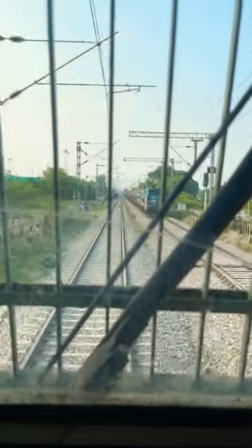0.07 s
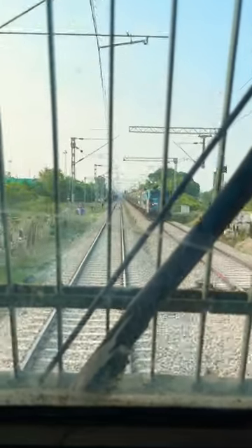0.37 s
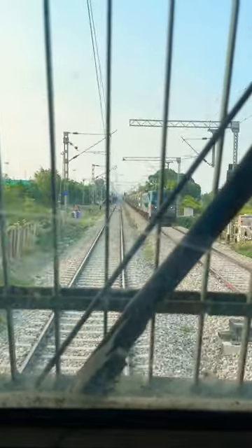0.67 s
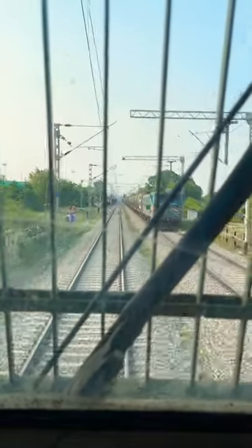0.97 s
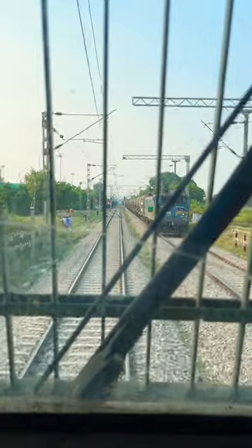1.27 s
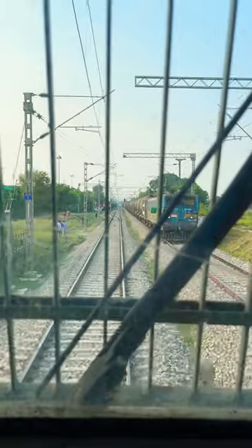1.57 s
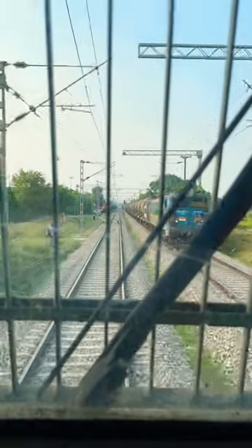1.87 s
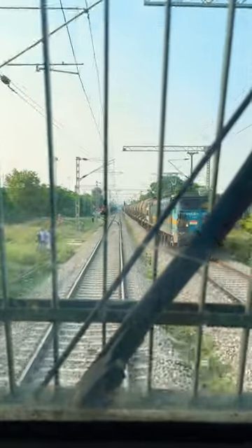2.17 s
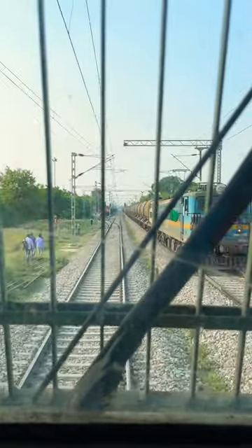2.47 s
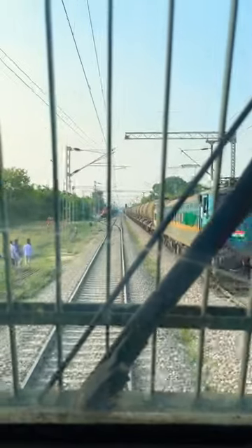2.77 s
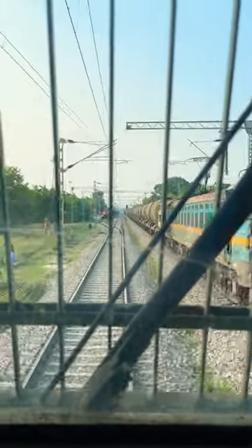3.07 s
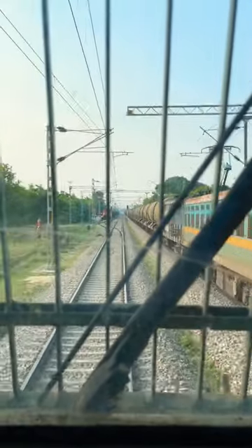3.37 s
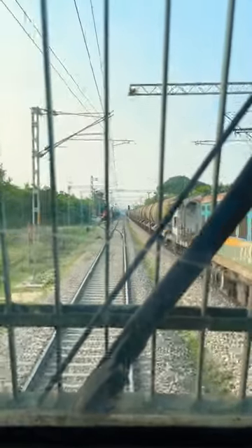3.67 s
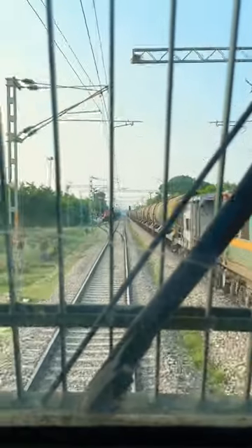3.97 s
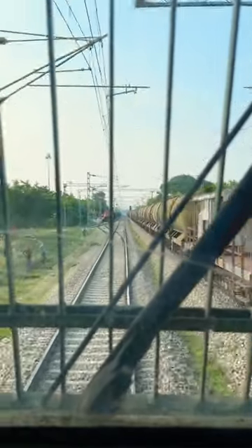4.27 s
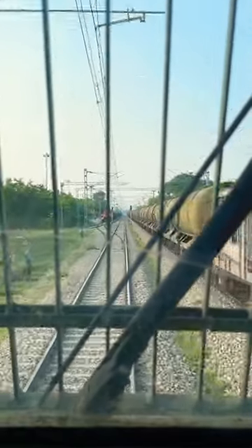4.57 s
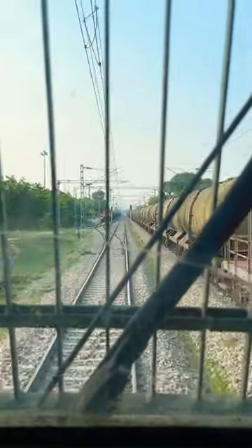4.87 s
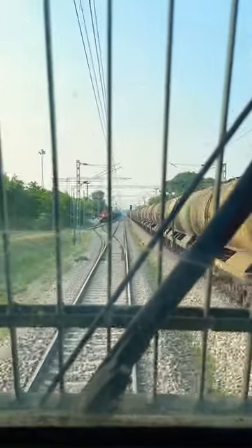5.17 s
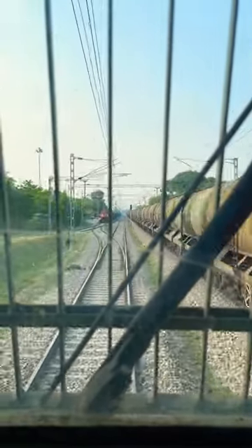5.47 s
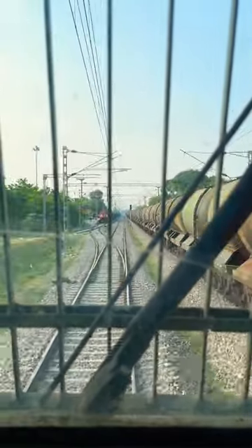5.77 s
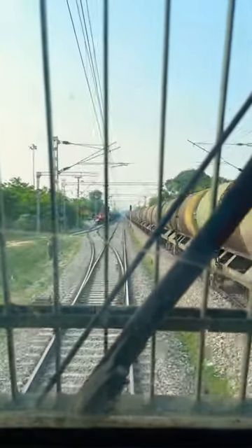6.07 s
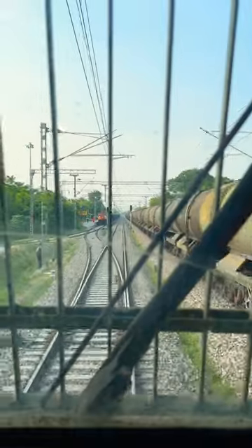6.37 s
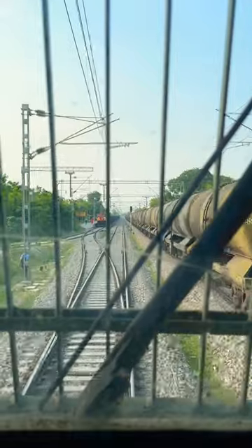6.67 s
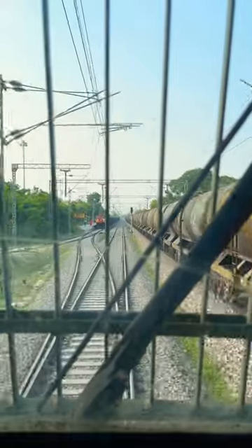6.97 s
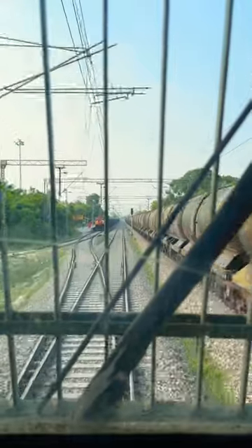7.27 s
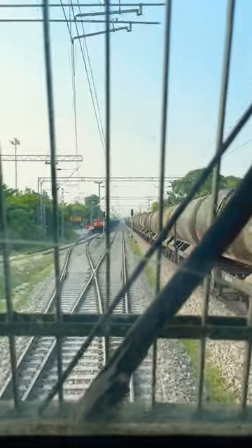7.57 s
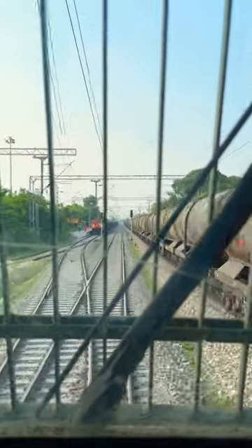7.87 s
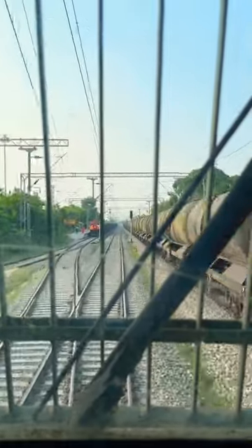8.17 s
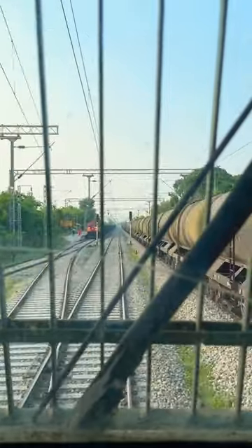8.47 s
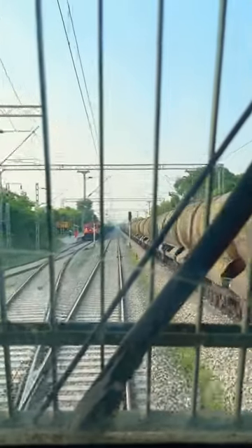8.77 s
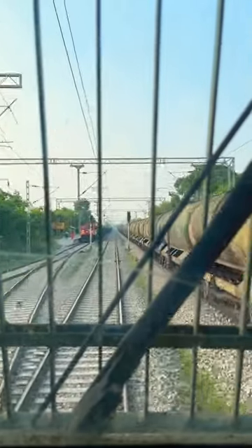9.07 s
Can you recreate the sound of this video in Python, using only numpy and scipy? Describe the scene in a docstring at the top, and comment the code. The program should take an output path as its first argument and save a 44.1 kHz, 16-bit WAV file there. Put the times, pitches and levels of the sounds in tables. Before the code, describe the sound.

An air horn sounds one brassy note from the start, heard inside the cab of a moving electric locomotive; it weakens, dulls and cuts off at about 0.8 seconds. A deep rumble from the track and floor runs throughout, growing steadily louder. Wheels thump over joints around 1.3 to 1.6 seconds, and again near 3, 4 and 6 seconds. Loose metal fittings tick three times around 2.5 seconds, among light knocks and soft, high swishes. From about 4 seconds a passing freight train adds a rolling roar with scattered clatter and dull clacks, while a wavering gear whine becomes stronger. The cab panels boom around 5.7 and 6.3 seconds. A valve vents compressed air in two short, bright hisses at about 7.8 and 8.5 seconds. The heaviest wheel thumps and panel booms come near 8.8 and 9.3 seconds, with the rumble still going.

```python
"""An air horn blares and cuts off, heard inside the cab of a moving electric locomotive.
Rough track shakes the floor and panels, wheels thump over joints, and the traction gears whine.
A freight train of tank wagons passes on the next line, adding its roar and throwing back the whine.
Loose fittings tick in the cab, and near the end a valve vents compressed air twice."""
import sys
import numpy as np
from scipy import signal
from scipy.fft import rfft, irfft, next_fast_len
from scipy.io import wavfile
from scipy.ndimage import uniform_filter1d, map_coordinates

SR = 44100
rng = np.random.default_rng(int(sys.argv[2]) if len(sys.argv) > 2 else 0)


def wrap_up_sound(samples):
    """Save the sound to the file named by the first command line argument, as 16-bit audio."""
    columns = np.atleast_2d(samples).T
    # keep every value between -1 and 1, then stretch to whole-number steps
    tamed = np.clip(columns, -1, 1)
    steps = np.round(tamed * 32767).astype(np.int16)
    wavfile.write(sys.argv[1], SR, steps)


N = 411453

# The horn's timbre. Each row: harmonic number, relative level in dB.
HORN_HARMONICS = [(1, 0), (2, -34), (3, -23), (4, -14), (5, -27), (6, -15.5), (7, -16), (8, -38), (9, -9),
                  (10, -22), (11, -26.5), (12, -28.5), (13, -29), (14, -32.5), (15, -31.5), (16, -33.5),
                  (17, -29.5), (18, -32), (19, -45), (20, -29), (21, -29), (22, -42), (23, -27), (24, -31),
                  (25, -28), (26, -47)]
# The blare sinks as the valve eases. Each row: time in seconds, relative level in dB.
BLARE_FADE = [(0, -34), (0.44, -32), (0.53, -36.5), (0.6, -38.5), (0.68, -39.5), (0.75, -43), (0.85, -45)]
# A hollow note stirred by the air stream. Each row: pitch in Hz, half-width in Hz, relative level in dB.
HORN_HOLLOW = [(698, 2.7, 2.5), (646, 14, -8), (652, 19, -11)]
# Air rushing through the horn. Each row: frequency in Hz, relative level in dB.
HORN_RUSH = [(700, -8), (1300, 9), (1550, 0.5), (2800, 4.5), (3600, -3), (5000, -5.5), (6000, 0),
             (8000, -2.5), (9500, -3.5), (11200, -13), (16000, 3.5)]

def horn():
    """An air horn with a weak, higher partner; as the pressure falls it rises, dips, dulls and stops."""
    bend_s, dull_s, shut_s = .55, .6, .776
    pitch_hz = 320.7 + 21 * since(bend_s)
    phase = phase_of(pitch_hz * (1 + .0011 * wobble(39.2))) + .016 * wobble(260)
    brass = overtones(phase, HORN_HARMONICS[1:10], flicker_db=.8, smear=.014, dull_db=27 * since(dull_s))
    buzz = overtones(phase, HORN_HARMONICS[10:], flicker_db=3.2, smear=.08, dull_db=0)
    partner_phase = phase_of(351.5 * (1 + .003 * wobble(45)))
    partner = unit(sum(amp(1.9 * wobble(19)) * np.sin(k * partner_phase + rng.uniform(0, 2 * np.pi))
                       for k, _ in HORN_HARMONICS[1:]))
    blare_db = curve(BLARE_FADE)
    easing_db = blare_db - np.mean([db for _, db in BLARE_FADE])
    fundamental = amp(-22.4 - 7.5 * bump(.497, width_s=.068) + .9 * wobble(30)) * np.sin(phase)
    hollow = amp(-42 + .39 * easing_db) * ringing(HORN_HOLLOW, steady=.4)
    blare = amp(blare_db - 3.5 - 14 * bump(.567, width_s=.02)) * brass  # breaks for an instant
    rasp = amp(-4.5 - 55 * since(dull_s)) * buzz + amp(-3.5) * partner + amp(2.5) * noise(HORN_RUSH)
    rasp *= amp(-46 + .49 * easing_db)
    blast = amp(-170 * since(shut_s)) * (fundamental + hollow + blare + rasp)
    return blast + amp(-18) * cab_echo(blast, t60=1.0)

def overtones(phase, harmonics, flicker_db, smear, dull_db):
    """Rough horn harmonics: smear jitters the phase, and each step above the sixth loses dull_db."""
    total = np.zeros(N)
    for k, db in harmonics:
        gain = amp(db + flicker_db * wobble(44.7) - dull_db * max(k - 6, 0))
        total += gain * np.sin(k * (phase + smear * wobble(70.6)))
    return total / np.sqrt(sum(amp(db) ** 2 for _, db in harmonics) / 2)

# Roughness of the track under the cab. Each row: time in seconds, relative level in dB.
TRACK_ROUGHNESS = [(0, -40.5), (0.15, -34), (0.75, -32.5), (1.0, -33.5), (1.3, -30.5), (3.7, -28.5),
                   (4.9, -23), (5.4, -25.5), (7.15, -23), (7.55, -24.5), (8.0, -23), (8.3, -24),
                   (8.8, -20.5), (9.33, -20)]
# The floor's dark colour. Each row: frequency in Hz, relative level in dB.
FLOOR_COLOUR = [(35, -33), (55, -10.5), (66, -5), (105, -1.5), (128, -6), (148, -13), (220, -18),
                (350, -29.5), (1500, -81)]
# Resonances of the cab's air. Each row: pitch in Hz, half-width in Hz, relative level in dB.
CAB_MODES = [(81.5, 10.6, -2), (98, 6.1, -2), (113.1, 13.6, -2)]

def floor_rumble():
    """The track shakes the floor and the air in the cab."""
    shaking = noise(FLOOR_COLOUR) + amp(1.5) * ringing(CAB_MODES, steady=.79)
    return amp(curve(TRACK_ROUGHNESS) - .77) * unit(shaking * amp(.7 * wobble(21)))

# Wheels striking joints and points. Each row: start in seconds, relative level in dB.
JOINTS = [(1.248, -10.5), (1.381, -11.5), (1.648, -7), (3.132, -8.5), (3.999, -7), (4.249, -4.5),
          (5.816, -3.5), (8.654, -12), (8.766, 2), (9.242, 2.5), (9.286, 0.5)]

def joint_thumps():
    """Each joint kicks the body into a short, low boom at a slightly different pitch."""
    thumps, t = np.zeros(N + SR), np.arange(SR // 2) / SR
    for (s, db), hz in zip(JOINTS, 96 * (1 + rng.normal(0, .11, len(JOINTS)))):
        bounce = np.sin(2 * np.pi * hz * t) * (1 - np.exp(-t / .0029))
        thumps[round(s * SR):][:len(t)] += amp(db - 5.5 - 60 * t / .13) * bounce
    return thumps[:N]

# Swells of the swaying body. Each row: time in seconds, level in dB.
SWAY_LEVEL = [(0, -36), (0.75, -33.5), (2.4, -41.5), (2.8, -32.5), (4.6, -42.5), (5.9, -33), (6.8, -36),
              (8.75, -28), (9.33, -44.5)]
# Resonances of the suspension. Each row: pitch in Hz, half-width in Hz, relative level in dB.
SPRING_MODES = [(49.2, 1.8, 9), (29, 4, -21)]

def body_sway():
    """The body rides on its springs with a deep drone."""
    bass = noise([(18, -39), (27, 3.5), (55, 9), (75, -19), (200, -63)])
    return amp(curve(SWAY_LEVEL)) * unit(bass + amp(.5) * ringing(SPRING_MODES, steady=.46))

# The panels flex. Each row: start in seconds, level in dB.
PANEL_FLEXES = [(1.43, -43), (5.64, -24), (6.24, -23), (8.96, -22), (9.25, -20)]
# Resonances of the panels. Each row: pitch in Hz, half-width in Hz, relative level in dB.
PANEL_MODES = [(170.2, 5, 4), (191.6, 11.8, -0.5), (222, 4.6, -4.5), (260, 12, -9.5), (298.5, 6.8, -6),
               (318, 21.4, -12), (394.2, 10.4, -6)]

def panel_boom():
    """The cab's panels hum louder on rough track and boom when they flex."""
    shaking = amp(-38.5 + .83 * swing(TRACK_ROUGHNESS) + 2.1 * wobble(4.5))
    flexing = strikes(PANEL_FLEXES, attack=.088, t60=.98)
    return np.hypot(shaking, flexing) * ringing(PANEL_MODES, steady=.53)

# The gears' mesh note, then its octave. Each row: time in seconds, relative level in dB.
MESH_LEVEL = [(0, -47), (0.35, -42), (1.2, -47), (3.6, -47), (4.35, -38), (5.1, -39.5), (5.3, -42.5),
              (5.6, -39.5), (6.05, -41), (6.55, -36), (7.45, -39.5), (7.85, -34.5), (8.15, -39),
              (8.38, -33), (8.6, -36.5), (9.33, -35.5)]
OCTAVE_LEVEL = [(0, -46.5), (1.25, -53), (2.8, -49), (3.8, -53), (4.0, -45), (5.1, -42), (5.35, -50),
                (5.63, -43.5), (6.03, -45.5), (6.17, -36), (6.42, -45), (6.62, -40), (6.73, -45),
                (6.86, -38), (7.05, -40), (7.25, -36.5), (7.55, -41), (7.7, -35), (7.88, -44.5),
                (8.28, -34), (8.46, -40), (8.57, -35.5), (8.74, -42.5), (8.86, -34), (9.03, -40.5),
                (9.33, -38)]
# The fuzz around each note. Each row: pitch in Hz, half-width in Hz, relative level in dB.
MESH_FUZZ = [(544, 17, -6), (566, 8.8, 1.5), (541, 14, -4.5)]
OCTAVE_FUZZ = [(1078, 17, -2), (1048, 9, -7)]

def gear_whine():
    """Traction gears churn on a fuzzy note and sing its octave, louder as the wagons throw both back."""
    mesh_db = curve(MESH_LEVEL) - .2 + 1.6 * wobble(18)
    octave_db = curve(OCTAVE_LEVEL) - .6 + 1.9 * wobble(24)
    phase = phase_of(hz=1079 + 7 * wobble(35))
    mesh = unit(ringing(MESH_FUZZ, steady=.9) + amp(-4) * np.sqrt(2) * np.sin(phase / 2))
    octave = unit(ringing(OCTAVE_FUZZ, steady=.95) + amp(1.5) * np.sqrt(2) * np.sin(phase))
    return amp(mesh_db) * mesh + amp(octave_db) * octave

# The freight train's roar builds. Each row: time in seconds, relative level in dB.
FREIGHT_SWELL = [(1.0, -53), (2.53, -51), (3.95, -50.5), (4.19, -45.5), (4.4, -44.5), (4.95, -44.5),
                 (5.36, -47.5), (5.68, -45), (6.06, -47.5), (6.32, -45.5), (8.86, -41.5), (9.2, -41)]
# The midrange body of rolling wheels. Each row: frequency in Hz, relative level in dB.
ROLLING_COLOUR = [(100, -24), (250, -2.5), (330, 4.5), (425, -2), (480, 4), (620, 2), (720, 0), (810, -6.5),
                  (980, -5), (1150, -4), (1450, -26), (3000, -40), (8000, -86)]

def freight_roll():
    """The passing train walls in the track noise and adds its own."""
    return amp(-40 + .87 * swing(FREIGHT_SWELL) + .66 * wobble(15)) * noise(ROLLING_COLOUR)

# Wagon wheels clattering close by. Each row: start in seconds, relative level in dB.
CLATTERS = [(3.98, -41.5), (4.21, -46), (4.43, -45.5), (5.06, -41), (5.56, -44.5), (5.68, -52), (6.46, -42),
            (6.57, -47), (9.22, -36)]
# Dull clacks of the running gear. Each row: start in seconds, relative level in dB, t60 in seconds.
WHEEL_CLACKS = [(1.405, -37.5, 0.044), (2.944, -36.5, 0.092), (3.048, -34, .09), (5.715, -31, .2),
                (6.422, -34, 0.1), (6.513, -32.5, 0.2), (6.625, -37.5, 0.086)]
# The bright roar, then the dull clack. Each row: frequency in Hz, relative level in dB.
WHEEL_COLOUR = [(300, -14.5), (900, 1), (1300, 2.5), (1460, 0.5), (1630, 4), (1850, -1.5), (2200, 0.5),
                (2800, -4), (3500, -9.5), (5000, -13), (8000, -13), (16000, -61)]
CLACK_COLOUR = [(150, -9), (500, 14), (750, 6.5), (1100, -7), (2300, -9), (3500, -20), (9000, -25)]

def wheels():
    """Steel wheels roar, clatter and clack on the rails; one flange squeals briefly."""
    roar = amp(-47 + swing(FREIGHT_SWELL) + .53 * wobble(25)) * noise(WHEEL_COLOUR)
    clatter = amp(2 * wobble(45)) * (noise(WHEEL_COLOUR) + amp(6) * noise(ROLLING_COLOUR))
    clatter *= strikes(CLATTERS, attack=.026, t60=.6)
    blows = sum(strikes([(s, db)], attack=.0011, t60=t60) for s, db, t60 in WHEEL_CLACKS)
    clacks = blows * amp(2) * noise(CLACK_COLOUR)
    squeal = strikes([(4.04, -49.5)], attack=.04, t60=1.0) * ringing([(2930, 40, 0)], steady=.6)
    return roar + clatter + clacks + squeal

# The valve vents. Each row: start in seconds, level in dB, seconds to open fully,
# seconds until it closes, fade in dB per second.
AIR_VENTS = [(7.775, -28, 0.08, 0.19, 81), (8.472, -29, 0.022, 0.11, 95)]
# The open jet's hiss. Each row: frequency in Hz, relative level in dB.
JET_COLOUR = [(700, -42), (2000, -3.5), (2800, 1), (3400, -2.5), (4600, -0.5), (5500, 2), (7300, 3),
              (8400, 4.5), (9500, 2.5), (11200, -3), (13000, 0), (16000, -1)]
# The pipe's notes. Each row: pitch in Hz, half-width in Hz, t60 in seconds,
# level in dB at the first closing, level in dB at the second.
PIPE_NOTES = [(3975, 100, .45, -38, -39), (5270, 150, 1.4, -45.5, -44), (5540, 150, 1.4, -50, -43.5),
              (6790, 120, .8, -42, -45), (8340, 105, .65, -32, -41)]

def air_valve():
    """Compressed air hisses through a slit, opens to a full jet, whistles on closing and then seeps."""
    swell_db_per_s, whistle_lead_s = 10, .011
    slit = noise([(4000, -30), (7500, -6), (9000, 2), (12000, -.5), (16000, -11)])
    full = noise(JET_COLOUR) + amp(-12) * ringing([(hz, w, 0) for hz, w, *_ in PIPE_NOTES], steady=0)
    air = strikes([(AIR_VENTS[-1][0], -37.5)], attack=.1, t60=3.4) * noise(JET_COLOUR)  # the seep
    for s, db, open_s, held_s, fade_db_per_s in AIR_VENTS:
        opening = np.clip(since(s) / open_s, 0, 1)
        swell_db = swell_db_per_s * (np.minimum(since(s), held_s) - held_s)
        fade_db = fade_db_per_s * since(s + held_s)
        flow = amp(db + swell_db - fade_db + .67 * wobble(70)) * np.sqrt(opening)
        fullness = np.clip(1.3 * opening ** 2, 0, 1)
        air += flow * (np.sqrt(fullness) * full + np.sqrt(1 - fullness) * slit)
    whistle_starts = [s + held_s - whistle_lead_s for s, _, _, held_s, _ in AIR_VENTS]
    for hz, width, t60, *levels_db in PIPE_NOTES:
        whistle = ringing([(hz, width, 0)], steady=.6)
        air += strikes(zip(whistle_starts, levels_db), attack=.011, t60=t60) * whistle
    return air

# Loose fittings tick. Each row: time in seconds, relative level in dB, pitch ratio.
FITTING_TICKS = [(2.413, -26.5, 1), (2.604, -29, .91), (2.804, -33.5, .9)]
# The highest fitting's ring. Each row: pitch in Hz, half-width in Hz, relative level in dB.
FITTING_MODES = [(5720, 150, -2), (7650, 170, 1), (8300, 280, 1.5), (10600, 300, -2)]
# A fitting's scrape. Each row: frequency in Hz, relative level in dB.
SCRAPE_COLOUR = [(1500, -16), (3300, -5), (4400, -9), (7000, 0), (9000, -1.5), (11000, -10), (16000, -10.5)]

def loose_fittings():
    """Loose metal fittings scrape and ring, each at its own pitch."""
    ticks = np.zeros(N)
    for s, db, ratio in FITTING_TICKS:
        ring = ringing([(hz * ratio, width, level) for hz, width, level in FITTING_MODES], steady=0)
        metal = amp(-6.5) * noise(SCRAPE_COLOUR) + amp(-5.5) * ring
        ticks += strikes([(s - .004, db)], attack=.011, t60=.13) * metal
    return ticks

# Knocks of the trim. Each row: start in seconds, level in dB, t60 in seconds.
TRIM_KNOCKS = [(1.401, -47, .17), (1.63, -53.5, .4), (2.004, -48, 0.22), (2.941, -47.5, 0.13),
               (3.049, -51.5, .13), (3.565, -47, .22), (3.987, -44.5, .4), (6.561, -39.5, 0.32)]
# Their dry colour. Each row: frequency in Hz, relative level in dB.
TRIM_COLOUR = [(900, -17), (1600, 1), (3000, 2.5), (4000, -3.5), (5500, -2.5), (7000, -7), (12000, -15)]

def trim_knocks():
    """The cab's trim knocks lightly in short bursts of noise."""
    return sum(strikes([(s, db)], attack=.0047, t60=t60) for s, db, t60 in TRIM_KNOCKS) * noise(TRIM_COLOUR)

# Light rustles close by. Each row: start in seconds, level in dB, t60 in seconds.
RUSTLES = [(2.01, -46, 0.64), (2.49, -43, 0.14), (2.717, -42, 0.12), (2.901, -37, 0.14),
           (3.077, -45.5, 0.82), (4.278, -37.5, .45), (5.651, -37.5, 0.45), (6.038, -38.5, 1),
           (6.214, -37.5, 0.81), (7.12, -37, 0.54), (7.26, -37.5, 0.57), (7.616, -37.5, .4),
           (8.24, -32, 0.61)]
# Their airy colour. Each row: frequency in Hz, relative level in dB.
RUSTLE_COLOUR = [(3000, -41), (5500, -2.5), (7000, 3), (9000, 0), (11000, 1.5), (13000, -5), (16000, 3)]

def rustles():
    """Soft, high swishes; the longer ones rise more slowly."""
    swells = sum(strikes([(s, db)], attack=.077 * t60, t60=t60) for s, db, t60 in RUSTLES)
    return swells * noise(RUSTLE_COLOUR)

# The window's thin hiss. Each row: frequency in Hz, relative level in dB.
DRAUGHT_COLOUR = [(1500, -36), (3500, -1.5), (5000, 0), (7000, -2), (8300, -4.5), (10000, 2.5), (11000, -6),
                  (13000, -1), (16000, -4)]

def window_draught():
    """A draught flutters at the window and grows with the passing train."""
    return amp(-57.5 + 1.23 * swing(FREIGHT_SWELL) + 2.7 * wobble(30)) * noise(DRAUGHT_COLOUR)

def cab_echo(x, t60):
    """The steel cab's short, diffuse answer."""
    t = np.arange(SR // 2) / SR
    tail = rng.standard_normal(len(t)) * amp(-60 * t / t60)
    return signal.fftconvolve(x, tail / np.linalg.norm(tail))[:N]

def amp(db):
    """Decibels to gain."""
    return 10 ** (np.asarray(db) / 20)

def unit(x):
    """Scale to rms 1."""
    return x / np.sqrt(np.mean(x ** 2) + 1e-20)

def since(s):
    """Seconds gone by after a moment, 0 before it."""
    return np.maximum(np.arange(N) / SR - s, 0)

def bump(s, width_s):
    """A brief, smooth swell to 1 around a moment."""
    return np.exp(-((since(0) - s) / width_s) ** 2)

def curve(rows):
    """A fader move through (seconds, dB) points."""
    return np.interp(since(0), *np.transpose(rows))

def swing(rows):
    """A fader move in dB above its own average."""
    db = curve(rows)
    return db - db.mean()

def wobble(rate):
    """A smooth random curve, rate knots a second."""
    return map_coordinates(rng.standard_normal(int(N * rate / SR) + 4), [np.arange(N) * rate / SR])

def phase_of(hz):
    """Running phase in radians of a moving pitch."""
    return 2 * np.pi * np.cumsum(hz) / SR

def along(points, hz):
    """Join (Hz, value) points on a log axis."""
    f, v = np.transpose(points)
    return np.interp(np.log(hz + 1), np.log(f + 1), v)

def filtered(x, response):
    """Shape x with a complex response of frequency."""
    m = next_fast_len(N + SR // 2)
    return irfft(rfft(x, m) * response(np.fft.rfftfreq(m, 1 / SR)), m)[..., :N]

def noise(colour):
    """Noise of rms 1, coloured by (Hz, dB) points."""
    return unit(filtered(rng.standard_normal(N), lambda hz: amp(along(colour, hz))))

def ringing(modes, steady):
    """(Hz, half-width, dB) resonances shaken at random, rms 1; steady 0-1 evens out their swells."""
    peaks = lambda f: sum(amp(db) / (1 + ((f - hz) / width) ** 2) for hz, width, db in modes)
    x = unit(filtered(rng.standard_normal(N), peaks))
    power = np.abs(uniform_filter1d(x ** 2, size=SR // 6)) + 1e-6
    return unit(x / power ** (steady / 2))

def strikes(rows, attack, t60):
    """Envelope of (seconds, dB) blows that fall 60 dB in t60 seconds; the attack rounds off each peak."""
    envelope, t = np.zeros(N + SR), np.arange(SR) / SR
    for s, db in rows:
        envelope[round(s * SR):][:len(t)] += amp(db - 60 * t / t60) * (1 - np.exp(-t / attack))
    return envelope[:N]

# Stereo width from the cab's echo. Each row: frequency in Hz, relative echo level in dB.
STEREO_WIDTH = [(60, -59), (200, -25.5), (400, -19.5), (700, -14.5), (1200, -26.5), (1800, -55.5),
                (4500, -50), (7000, -11), (11000, -45), (15000, -19.5)]
# Phase between the sides. Each row: frequency in Hz, left's lead in radians.
STEREO_PHASE = [(5200, 0), (6200, -.5), (6600, -1), (7600, -1.6), (9000, -1.95), (10400, -2.7),
                (12400, -3.14), (13700, -3.35), (15800, -4.3)]
# A slight lean to the left. Each row: frequency in Hz, left over right in dB.
STEREO_LEAN = [(250, 0), (650, 1), (1100, 0.73), (1600, 0)]

def scene():
    """The whole cab in narrow stereo, the two sides drifting out of phase in the treble."""
    cab = floor_rumble() + body_sway() + panel_boom() + freight_roll() + joint_thumps()
    cab += gear_whine() + wheels() + horn() + window_draught() + air_valve()
    cab += loose_fittings() + trim_knocks() + rustles()
    diffuse = filtered(cab_echo(cab, t60=.12), lambda hz: amp(along(STEREO_WIDTH, hz)))
    left = lambda hz: np.exp(.5j * along(STEREO_PHASE, hz)) * amp(along(STEREO_LEAN, hz) / 2)
    sides = np.array([cab + diffuse, cab - diffuse])
    return filtered(sides, lambda hz: np.array([left(hz), 1 / left(hz)]))

def record(dry):
    """Thin out the deepest bass and cut the very top."""
    top_hz = 15800
    return filtered(dry, lambda hz: (hz < top_hz) * amp(along([(12, -19), (25, .5)], hz)))

dry = scene()
out = record(dry)
wrap_up_sound(out)
```